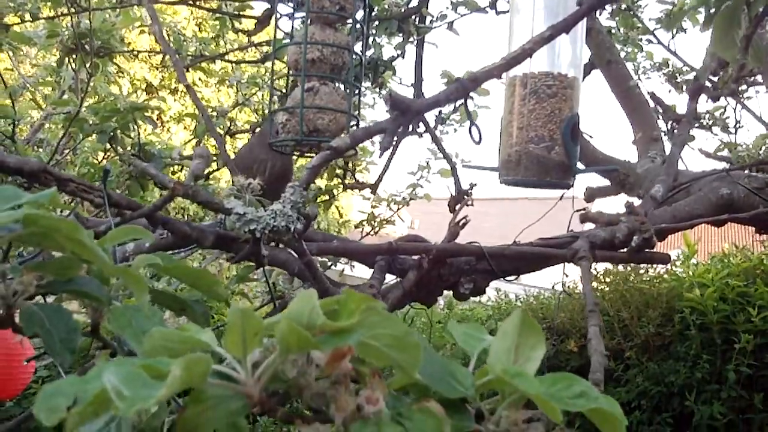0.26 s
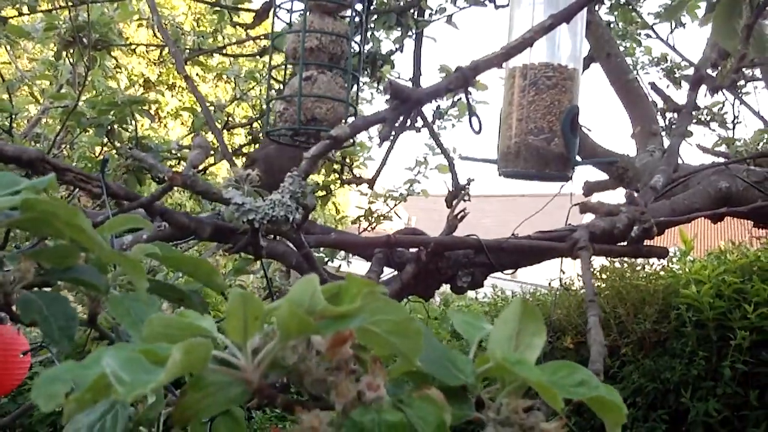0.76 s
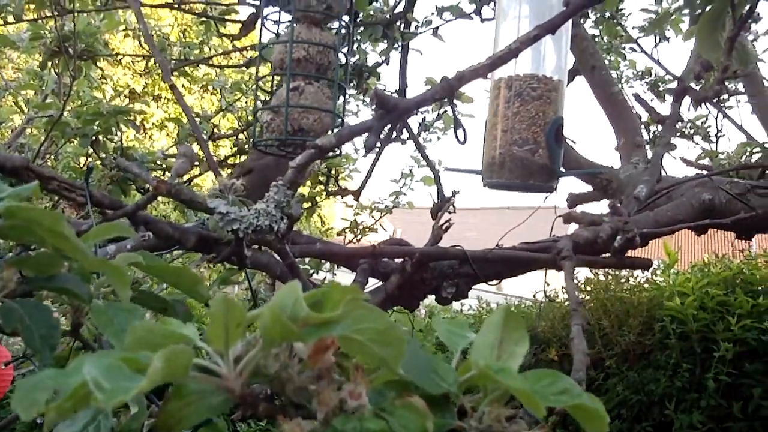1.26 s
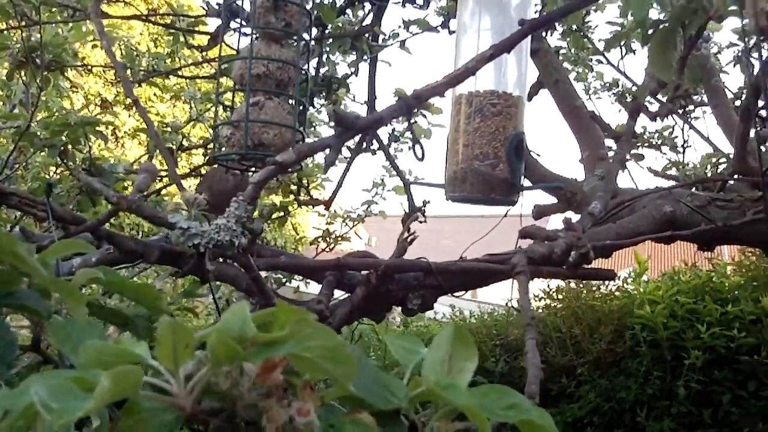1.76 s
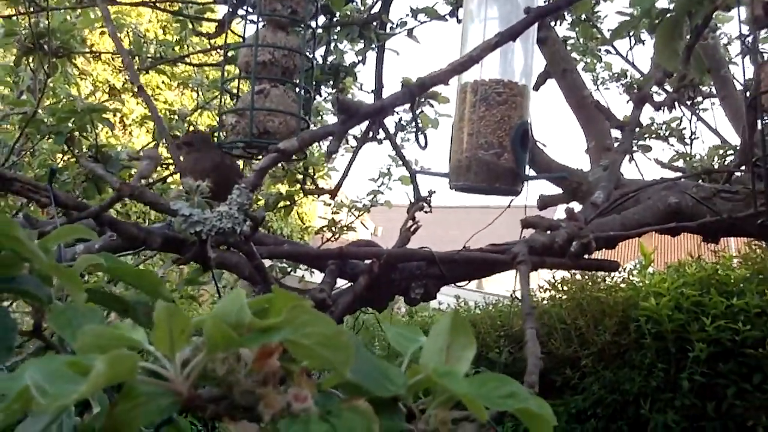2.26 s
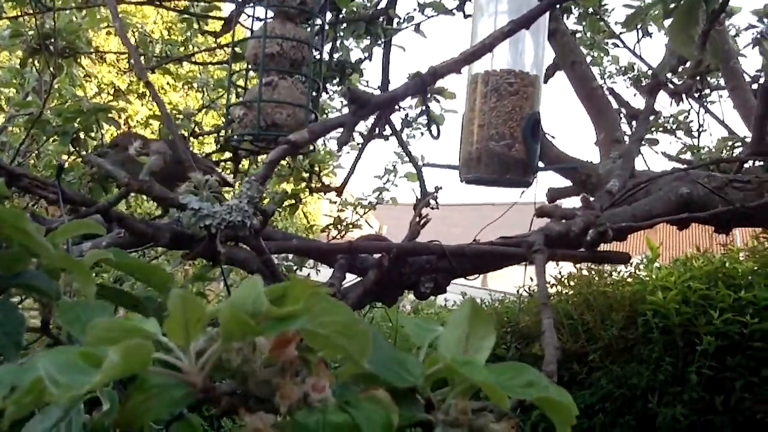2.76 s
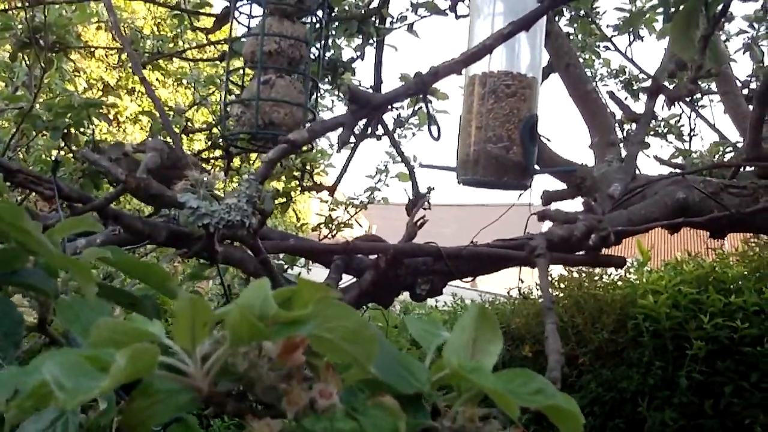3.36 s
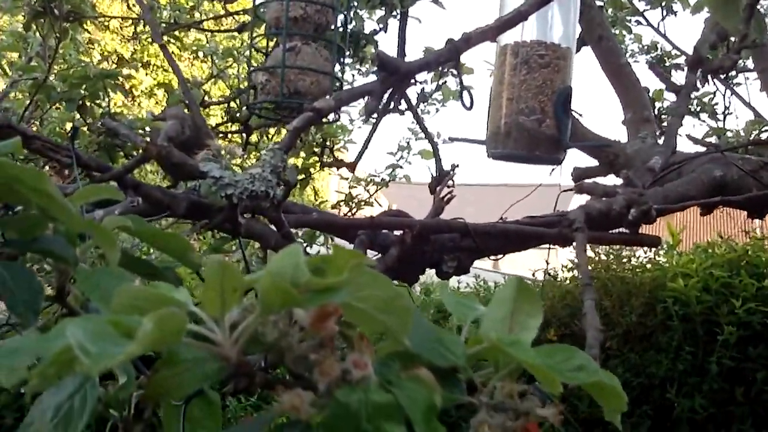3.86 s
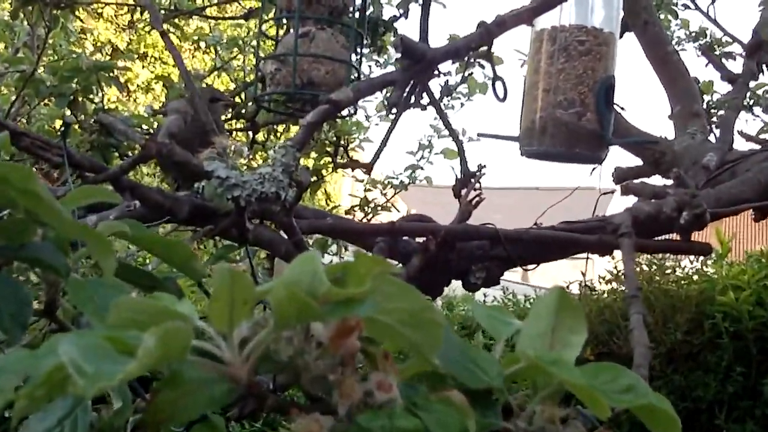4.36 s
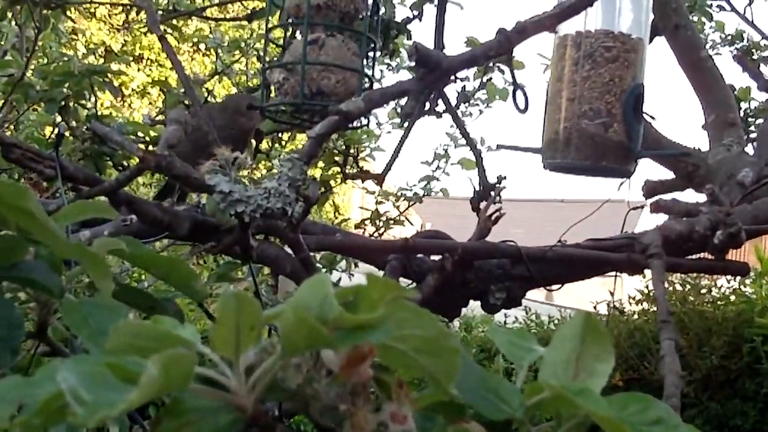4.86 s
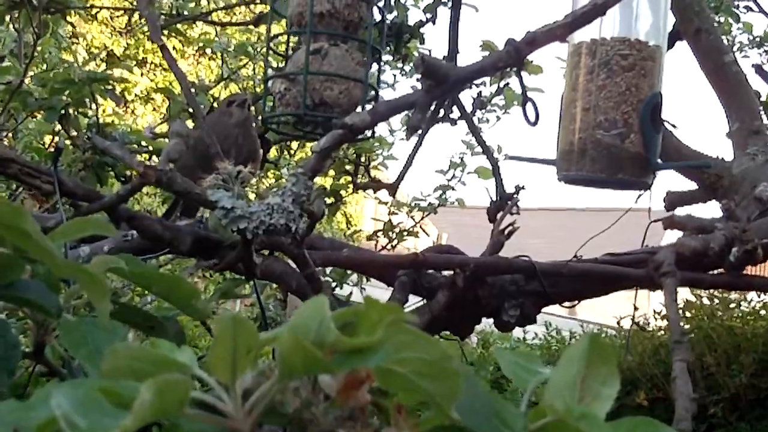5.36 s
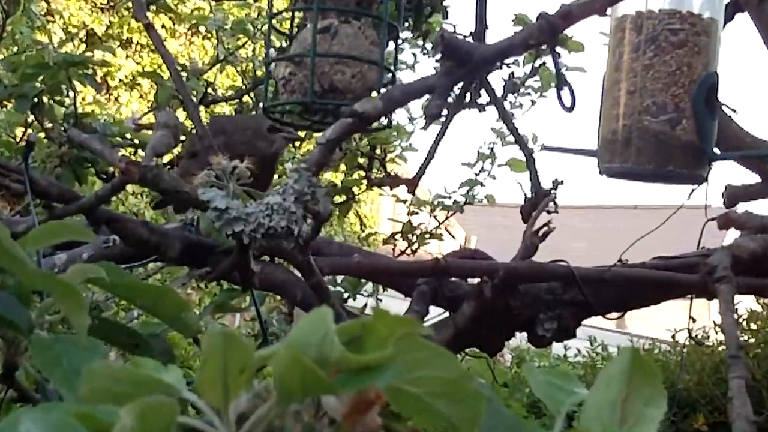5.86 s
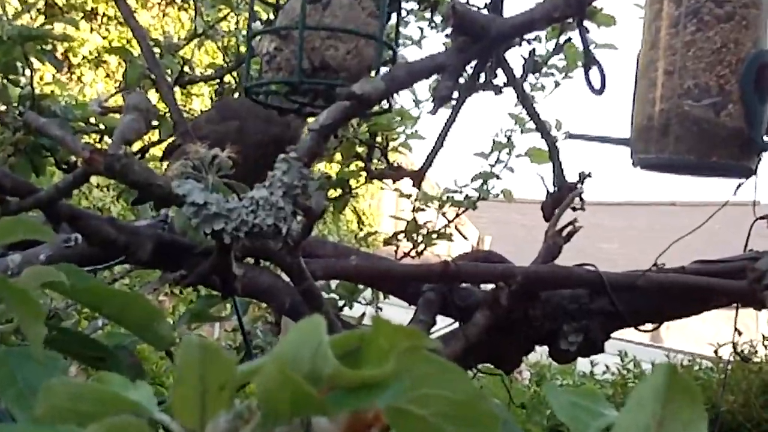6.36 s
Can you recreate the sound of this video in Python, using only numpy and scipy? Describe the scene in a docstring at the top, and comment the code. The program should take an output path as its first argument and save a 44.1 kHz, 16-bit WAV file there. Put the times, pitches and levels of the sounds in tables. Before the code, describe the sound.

Close handling noises on a camera stand out against soft outdoor hiss, distant traffic and rumble. First come light finger taps and two hollow knocks, among faint peeps and rustles. Four sharp, loud snaps of the zoom switch follow, ringing the casing, while the zoom motor adds a thin, fluttering whine. Far off in the garden, a bird gives a quick falling whistle three times, with a slight echo.

```python
"""A quiet garden heard from a hand-held camera, over rumble, far traffic and hiss. A distant bird whistles
a falling phrase. In the first 3 s fingers tap the camera and the hand bumps it twice, ringing its body,
among faint peeps and rustles. From 3.6 s the zoom switch snaps in and out twice, ringing the casing and
overloading the microphone. Just after the first snap the zoom drive's faint, pulsing whine steps up and
runs to the end; the bird repeats its phrase near 4 s and 5 s."""
import sys
import numpy as np
from scipy import signal
from scipy.fft import rfft, irfft
from scipy.io import wavfile
from scipy.ndimage import uniform_filter1d

SR = 44100
rng = np.random.default_rng(int(sys.argv[2]) if len(sys.argv) > 2 else 0)


def file_out(sig):
    """Save sig as 16-bit WAV at sys.argv[1]."""
    # one column per channel
    cols = np.atleast_2d(sig).T
    # limit, then scale
    lim = np.clip(cols, -1, 1)
    pcm = np.round(lim * 32767).astype(np.int16)
    wavfile.write(sys.argv[1], SR, pcm)


N = 291060
TIME = np.arange(N) / SR
CUTOFF_HZ = 15900


# t/s, level/dB
SWITCH_PRESSES = [(3.64076, -1), (5.06045, -3.5)]
SWITCH_RELEASES = [(4.5456, 0.042), (6.5286, 0.63)]
# f/Hz, t60/s, press level/dB, release level/dB; the last three, heavily damped, make the crack
CASING_MODES = [(418.8, .4, -29, -25.5), (618.5, 0.062, -16, -0.5), (656.7, 0.022, 9, 18),
                (727.5, .032, 7, 9.5), (846.5, 0.04, 6.5, 7), (1273, 0.0425, 4, 2.5),
                (1516, 0.029, 7.5, -26), (989.6, 0.0058, 33.5, 21), (1107, 0.002814, 40.5, -6),
                (1287.4, 0.0091, 28, 10)]

def zoom_switch():
    """The switch snaps in and springs back, shoving the casing in opposite directions."""
    press_modes = [(hz, t60, db) for hz, t60, db, _ in CASING_MODES]
    release_modes = [(hz, t60, db) for hz, t60, _, db in CASING_MODES]
    press = snaps(SWITCH_PRESSES, press_modes, direction=1,
                  swell_ms=0.32, drop_ms=0.095, push_db=46.5, sway_db=-8.5)
    release = snaps(SWITCH_RELEASES, release_modes, direction=-1,
                    swell_ms=0.75, drop_ms=0.1, push_db=31.5, sway_db=-10.5)
    return press + release


def snaps(events, modes, direction, swell_ms, drop_ms, push_db, sway_db):
    """The switch dome buckles ever faster; the casing rings and the whole camera sways back."""
    force = sum(from_db(db) * contact(s, swell_ms, drop_ms) for s, db in events)
    sway = from_db(sway_db) * ring(force, hz=34.6, t60=0.091)
    shove = from_db(push_db) * force - sway
    return direction * shove - struck_modes(force, modes)


# t/s, level/dB, force swell/ms
HAND_BUMPS = [(1.443, -1, 0.17), (2.4464, -3.5, 0.34)]
# f/Hz, t60/s, level/dB
BODY_MODES = [(149, 0.059, -2), (173.3, 0.15, -6.5), (257, 0.019, 6.5), (313, 0.019, -1.5),
              (425.5, 0.23, -29), (427, 0.038, 1), (546, 0.026, 7.5), (572, 0.047, 3), (722, 0.03, -6.5),
              (740, 0.066, -17), (903, 0.068, -12), (985, 0.062, -10.5), (1043, 0.053, -6.5),
              (1296, 0.016, -8), (1297, 0.066, -15.5), (1460, 0.029, -37)]

def bumps(drop_ms=0.22, push_db=30):
    """Soft blows of the hand ring the whole camera body."""
    force = sum(from_db(db) * contact(s, swell_ms, drop_ms) for s, db, swell_ms in HAND_BUMPS)
    return from_db(push_db) * force + struck_modes(force, BODY_MODES)


# t/s, pad level/dB, hold/s, nail level/dB
FINGER_TAPS = [(0.93, -20, .0373, -37.5), (1.436, -22, 0.054, -41), (1.9142, -21.5, 0.028, -32.5),
               (2.44, -19.5, .068, -40.5), (2.992, -22.5, 0.025, -35)]
# nail alone, as the grip shifts: t/s, level/dB
GRIP_TICKS = [(0.555, -41), (2.611, -43), (2.635, -44), (2.973, -34.5), (3.734, -43)]
# f/Hz, t60/s, pad level/dB, nail level/dB
GRIP_MODES = [(117, 0.022, -6, 8), (453, 0.046, -4, -55), (580, 0.025, -9.5, -15), (663, 0.029, -14, 1.5),
              (883, 0.068, -37, -2), (1090, 0.015, -22, -1), (1350, 0.043, -53, -3.5)]

def taps(swell_ms=0.027, drop_ms=0.16, nail_to_pad_db=-2, pad_to_nail_db=-30):
    """A finger lands on its pad with a thud and lifts off with a brighter flick of the nail."""
    flicks = [(s + hold_s, db) for s, _, hold_s, db in FINGER_TAPS] + GRIP_TICKS
    landings = sum(from_db(db) * contact(s, swell_ms, drop_ms) for s, db, *_ in FINGER_TAPS)
    ticks = sum(from_db(db) * contact(s, swell_ms, drop_ms) for s, db in flicks)
    pad = landings + from_db(nail_to_pad_db) * ticks
    nail = ticks + from_db(pad_to_nail_db) * landings
    return sum((-1) ** k * ring(from_db(pad_db) * pad + from_db(nail_db) * nail, hz, t60)
               for k, (hz, t60, pad_db, nail_db) in enumerate(GRIP_MODES))


# t/s, level/dB, centre/Hz, width/Hz, t60/s
FRICTION_BURSTS = [(1.134, -48, 7500, 3000, .02), (2.679, -58, 7300, 1190, .25),
                   (3.899, -41.5, 5550, 5990, 0.018), (3.904, -40.5, 663, 1660, .13),
                   (4.789, -52.5, 9730, 8790, .3), (6.148, -44.5, 6870, 2086, 0.073),
                   (6.329, -49, 6750, 1506, .04)]

def rustles(rise_per_t60=0.064):
    """Fine friction: short bursts of band noise that swell and die away."""
    out, t = np.zeros(N), TIME[:SR // 2]
    for s, db, centre_hz, width_hz, t60 in FRICTION_BURSTS:
        low_hz = np.hypot(centre_hz, width_hz / 2) - width_hz / 2
        noise = band_noise(len(t), low_hz, min(low_hz + width_hz, CUTOFF_HZ), order=2)
        rise_s = rise_per_t60 * t60
        envelope = np.minimum(t / rise_s, 1) * from_db(-60 * np.maximum(t - rise_s, 0) / t60)
        add(out, from_db(db) * envelope * noise, s)
    return out


# main note t/s, gain/dB
BIRD_PHRASES = [(0.100, 1), (4.046, 3), (5.087, 3.5)]
# t/s from the main note, top f/Hz, fall to each end/Hz, length/s, level/dB
BIRD_NOTES = [(-.09, 6150, 450, .03, -60.5), (-.061, 5220, 1795, 0.036, -52.5),
              (-.025, 4510, 810, 0.028, -57.5), (0, 3810, 900, .035, -49.5), (.06, 3350, 382, .03, -58.5)]
# t/s, top f/Hz, level/dB
FAR_PEEPS = [(1.47, 7100, -62), (1.607, 3100, -59), (2.48, 6940, -63), (2.95, 6800, -66),
             (3.703, 7080, -54.5)]

def birds(waver=0.032, arch_power=1.1, peep_fall_hz=500, peep_s=0.025):
    """Each note is a slightly unsteady whistle whose pitch rises and falls in a pointed arch."""
    notes = [(s + offset_s, top_hz, fall_hz, length_s, db + gain_db)
             for s, gain_db in BIRD_PHRASES for offset_s, top_hz, fall_hz, length_s, db in BIRD_NOTES]
    notes += [(s, top_hz, peep_fall_hz, peep_s, db) for s, top_hz, db in FAR_PEEPS]
    out = np.zeros(N)
    for s, top_hz, fall_hz, length_s, db in notes:
        u = np.linspace(-1, 1, int(length_s * SR))
        jitter = unit_rms(uniform_filter1d(rng.standard_normal(SR // 4), size=60))[:len(u)]
        hz = (top_hz - fall_hz * np.abs(u) ** arch_power) * (1 + waver * jitter)
        whistle = np.sin(2 * np.pi * np.cumsum(hz) / SR)
        add(out, from_db(db) * np.sqrt(1 - u ** 2) * whistle, s - length_s / 2)
    return out


def garden_echo(x, t60=0.48, wet_db=1, build_s=0.011, side_db=-9):
    """Leaves, fences and walls scatter a call into a diffuse tail."""
    t = TIME[:SR * 2 // 3]
    envelope = (1 - np.exp(-t / build_s)) * from_db(-60 * t / t60)
    mid, side = rng.standard_normal((2, len(t))) * envelope / np.linalg.norm(envelope)
    echoes = mid + from_db(side_db) * side * [[1], [-1]]
    return x + from_db(wet_db) * signal.fftconvolve(x[None], echoes, axes=1)[:, :N]


# f/Hz, relative level/dB
WHINE_TONES = [(11988, 0), (15585, -16), (15644, -13)]

def zoom_drive(on_s=3.83, idle_db=-73.5, run_db=-59.5, pulse_hz=30, idle_rest=0.17, rest_per_s=0.1):
    """The drive whines in pulses: it idles, then runs, resting for a growing share of each cycle."""
    drive_db = np.where(TIME < on_s, idle_db, run_db)
    rest_share = idle_rest + rest_per_s * np.maximum(TIME - on_s, 0)
    gate = uniform_filter1d(1.0 * (TIME * pulse_hz % 1 > rest_share), size=200)
    whine = sum(from_db(drive_db + db) * np.sin(2 * np.pi * hz * TIME) for hz, db in WHINE_TONES)
    return gate * whine


def fizz(rate_hz=10, level_db=-60, spread_db=(-4.8, 3)):
    """The camera adds faint, regular puffs of treble noise, uneven in level."""
    cycles = TIME * rate_hz + 0.67
    puff_index = cycles.astype(int)
    puff_db = level_db + rng.uniform(*spread_db, puff_index[-1] + 1)
    envelope = from_db(puff_db[puff_index]) * np.sin(np.pi * cycles) ** 10
    return envelope * band_noise(N, low_hz=9000, high_hz=13000, order=1)


# t/s, relative level/dB
HAND_UNSTEADINESS = [(0.0, -45.5), (0.53, -44), (2.54, -41.5), (2.72, -34), (3.29, -43), (3.67, -40),
                     (4.82, -40), (5.04, -38), (5.84, -42.5), (6.6, -48.5)]
# f/Hz, relative density/dB
RUMBLE_SPECTRUM = [(15, -8.5), (27, -9.5), (33, -7), (38.5, 2.5), (45, -14.5), (54, -20.5), (75, -22.5),
                   (110, -30.5), (200, -43.5)]

def hand_rumble(gain_db=5):
    """The unsteady hand makes the camera body rumble."""
    level_db = np.interp(TIME, *np.transpose(HAND_UNSTEADINESS)) + gain_db
    return from_db(level_db) * stereo_noise(RUMBLE_SPECTRUM + [(1000, -82)])


# f/Hz, relative density/dB
TRAFFIC_SPECTRUM = [(60, -2), (120, -2), (220, 0.5), (400, -7.5), (900, -9), (1600, -14.5), (3000, -16.5),
                    (7000, -18.5), (16000, -39)]

def traffic(start_db=-51.5, fade_db_per_s=0.36):
    """Far traffic slowly recedes."""
    return from_db(start_db - fade_db_per_s * TIME) * stereo_noise(TRAFFIC_SPECTRUM)


# f/Hz, relative density/dB
HISS_SPECTRUM = [(300, -8.5), (2000, 2), (5000, -9), (8000, -2), (12000, -0.5), (16000, -1)]

def hiss(level_db=-58):
    """Steady microphone noise."""
    return from_db(level_db) * stereo_noise(HISS_SPECTRUM)


# f/Hz, left-right correlation
STEREO_CORRELATION = [(30, .9998), (500, .995), (1000, .97), (2000, .95), (4000, .92), (8000, .78),
                      (14000, .66)]

def stereo_noise(spectrum):
    """Coloured noise of unit rms, wider towards the treble."""
    hz = np.fft.rfftfreq(N, 1 / SR)
    correlation = at_hz(STEREO_CORRELATION, hz)
    mid, side = rfft(rng.standard_normal((2, N))) * from_db(at_hz(spectrum, hz))
    channels = np.sqrt(1 + correlation) * mid + np.sqrt(1 - correlation) * side * [[1], [-1]]
    return unit_rms(irfft(channels, N))


def band_noise(samples, low_hz, high_hz, order):
    """Band-passed noise of unit rms."""
    band = signal.butter(order, [low_hz, high_hz], "band", fs=SR, output="sos")
    return unit_rms(signal.sosfilt(band, rng.standard_normal(samples)))


def contact(s, swell_ms, drop_ms):
    """A force of unit sum that grows exponentially until time s, then collapses."""
    ms = (TIME - s) * 1000
    tau_ms = np.where(ms < 0, swell_ms, drop_ms)
    force = np.exp(-np.minimum(np.abs(ms) / tau_ms, 40))
    return force / force.sum()


def struck_modes(force, modes):
    """Sum of modes; neighbours swing in opposite senses."""
    return sum((-1) ** k * from_db(db) * ring(force, hz, t60, struck=True)
               for k, (hz, t60, db) in enumerate(modes))


def ring(force, hz, t60, struck=False):
    """One mode; a unit click starts a decaying sine of height 1, or a cosine if struck."""
    r, w = from_db(-60 / (t60 * SR)), 2 * np.pi * hz / SR
    b = [1, -r * np.cos(w)] if struck else [0, r * np.sin(w)]
    return signal.lfilter(b, [1, -2 * r * np.cos(w), r * r], force + 1e-18)


def from_db(db):
    """Decibels to gain."""
    return 10 ** (np.asarray(db) / 20)


def unit_rms(x):
    """Scale to unit rms."""
    return x / np.sqrt(np.mean(x ** 2) + 1e-20)


def at_hz(points, hz):
    """Interpolate on a log-frequency axis."""
    f, value = np.transpose(points)
    return np.interp(np.log(hz + 1), np.log(f), value)


def add(out, sound, s):
    """Mix a sound in from time s on."""
    start = max(round(s * SR), 0)
    out[start:start + len(sound)] += sound[:N - start]


def scene(left_db=0.24, lag_samples=0.12):
    """Knocks in the camera body are dry and reach the right microphone slightly late; birds echo."""
    body = zoom_switch() + bumps() + taps()
    left = from_db(left_db) * body
    right = signal.lfilter([1 - lag_samples, lag_samples], [1], body)
    near = np.array([left, right]) + zoom_drive() + fizz() + rustles()
    return near + garden_echo(birds()) + hand_rumble() + traffic() + hiss()


def record(dry, knee=15.0):
    """The input overloads with a narrow rounded knee, and the top is cut."""
    clipped = dry / (1 + np.abs(dry) ** knee) ** (1 / knee)
    lowpass = signal.ellip(10, 0.02, 60, CUTOFF_HZ, fs=SR, output="sos")
    return signal.sosfiltfilt(lowpass, clipped)


dry = scene()
out = record(dry)
file_out(out)
```